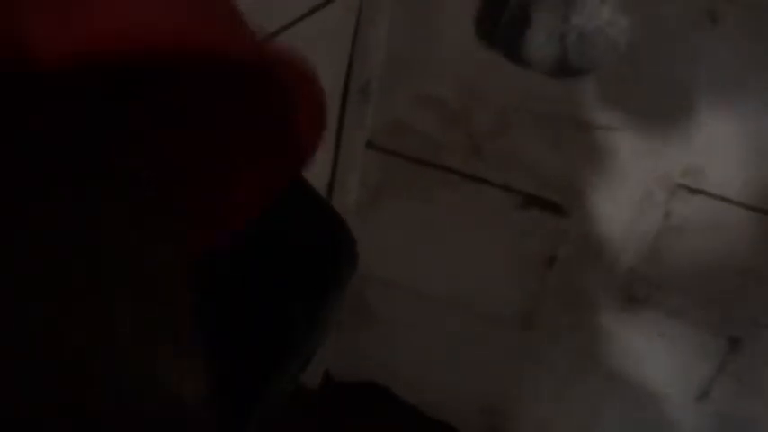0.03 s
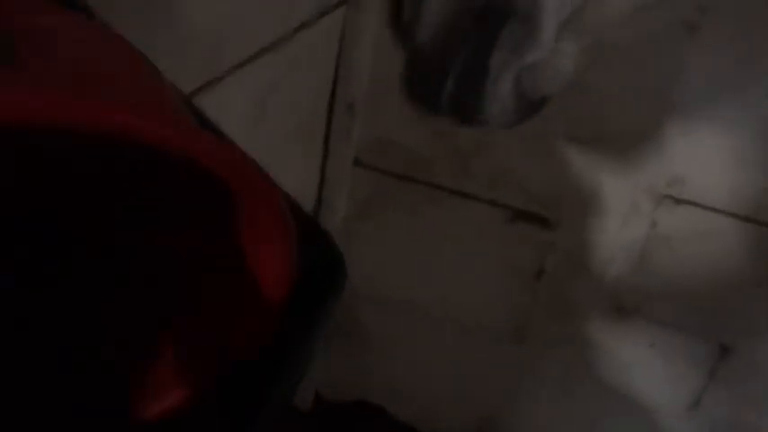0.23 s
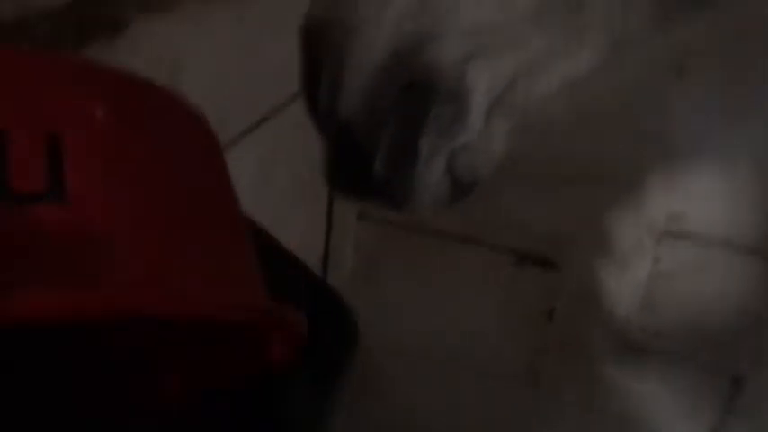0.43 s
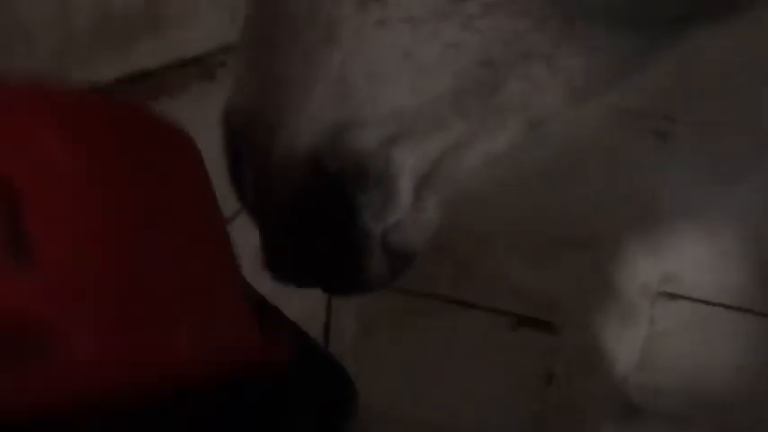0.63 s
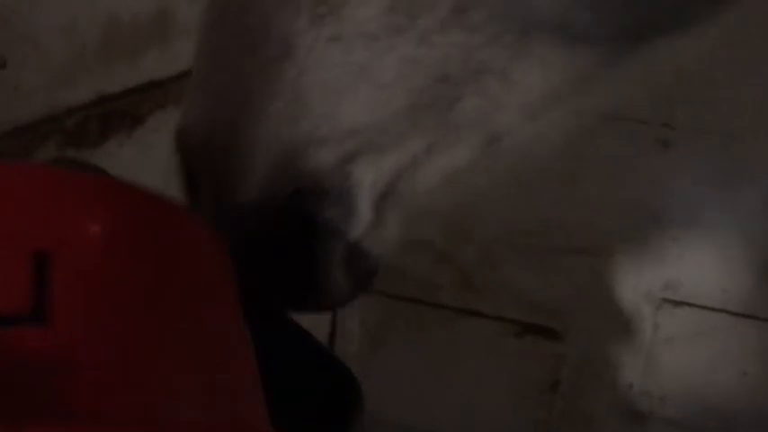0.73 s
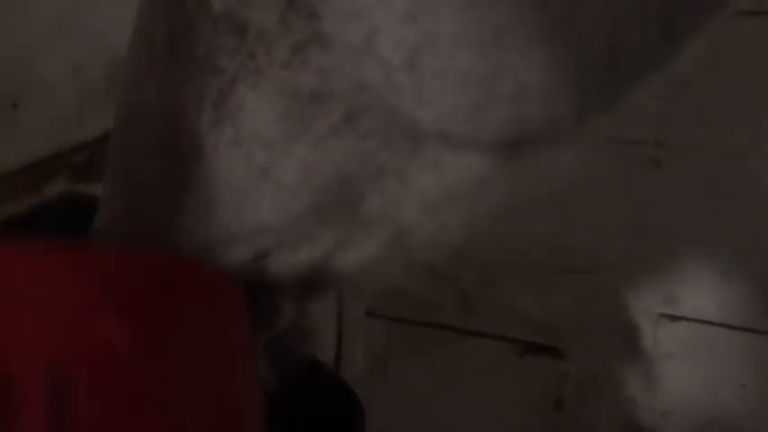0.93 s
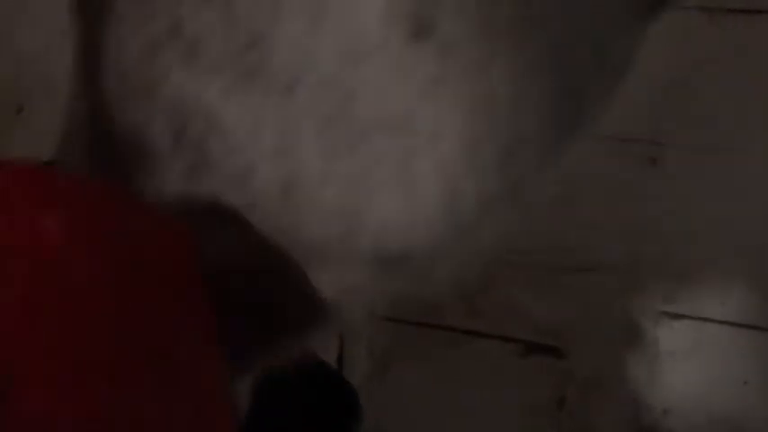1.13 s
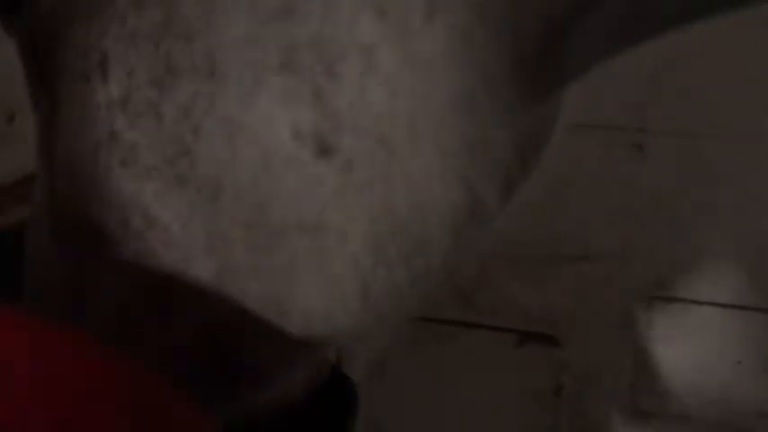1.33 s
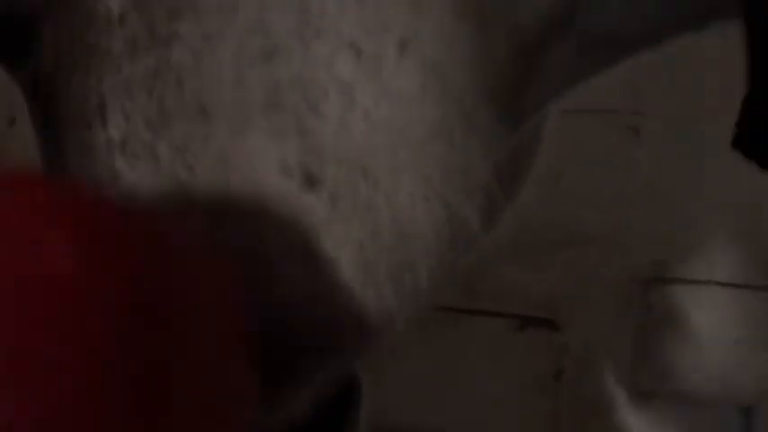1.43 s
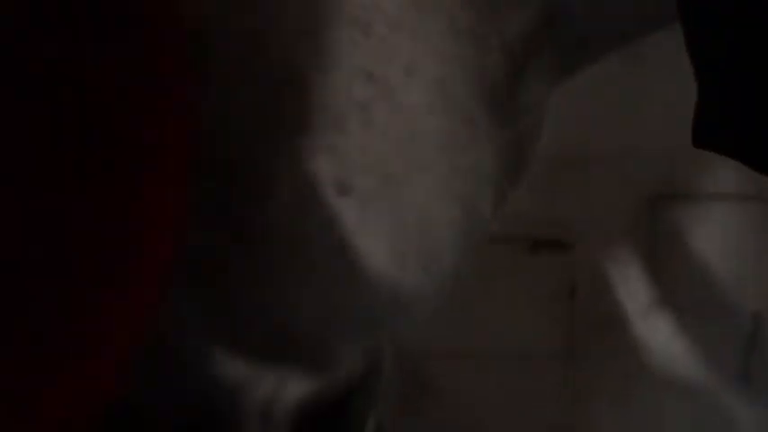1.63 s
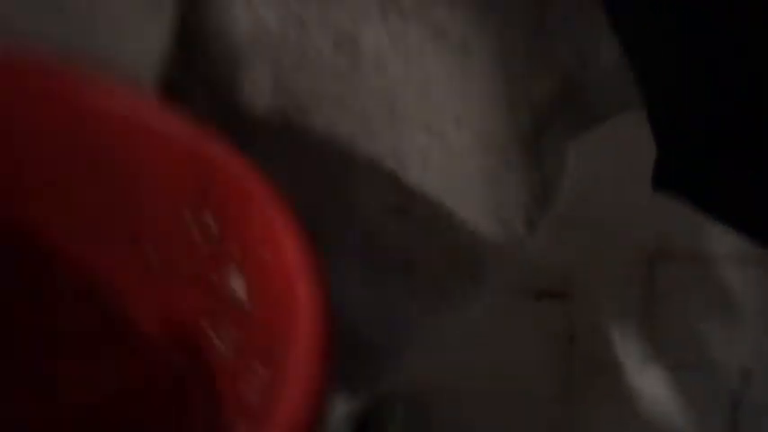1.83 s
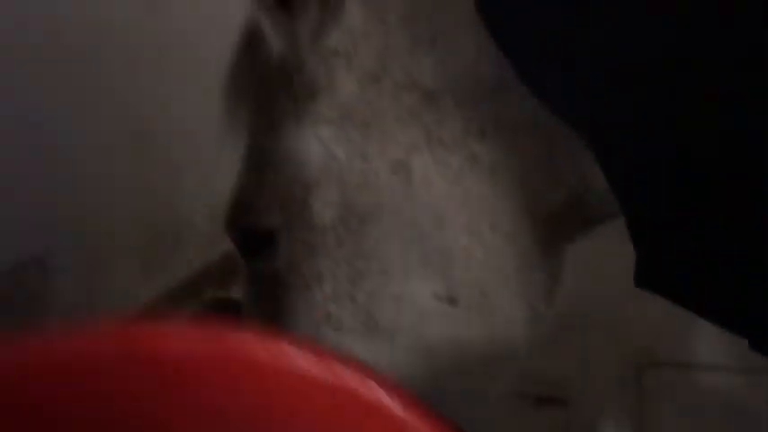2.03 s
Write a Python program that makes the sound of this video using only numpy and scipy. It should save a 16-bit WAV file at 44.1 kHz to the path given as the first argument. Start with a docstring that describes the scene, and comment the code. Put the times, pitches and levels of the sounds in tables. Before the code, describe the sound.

Plastic feed bucket knocks hollowly on a tub as the last pellets hiss out, then scuffs away

```python
"""In a horse stall, the last feed slides hissing out of a plastic bucket into a tub, as dense tiny impacts.
Stray pellets tick during the pour and on among the knocks, each a short noise burst with its own pitch.
The bucket knocks on the tub: its base booms and its wall rings as fading tones, noise cracks, the tub hums on.
Then it scuffs away with hollow rumbles made of quick slips, and a few dull bumps, each one short low tone.
The stable adds a short, dull echo and a low background rumble."""
import sys
import numpy as np
from scipy import signal
from scipy.fft import rfft, irfft, next_fast_len
from scipy.io import wavfile

SR = 44100
rng = np.random.default_rng(int(sys.argv[2]) if len(sys.argv) > 2 else 0)


def generate_wav(signal):
    """Clip the signal to [-1, 1] and save it as 16-bit WAV at the path in sys.argv[1]."""
    frames = np.transpose(np.atleast_2d(signal))
    scaled = np.clip(frames, -1, 1) * 32767
    pcm = np.round(scaled).astype(np.int16)
    wavfile.write(sys.argv[1], SR, pcm)


N = 91595
T = np.arange(N) / SR  # time of every sample [s]


def amp(db):
    """Turn decibels into a gain."""
    return 10 ** (np.asarray(db) / 20)


def unit(x):
    """Scale x to an average (rms) level of 1."""
    return x / np.sqrt(np.mean(x ** 2) + 1e-20)


def along(points, hz):
    """Read a curve of (frequency, value) points, with frequency on a log axis."""
    f, v = np.transpose(points)
    return np.interp(np.log(hz + 1), np.log(f + 1), v)


def filtered(x, response):
    """Multiply the spectrum of x by a response that depends on frequency."""
    m = next_fast_len(len(x) + 8192)  # spare room for what rings past the end
    hz = np.fft.rfftfreq(m, 1 / SR)
    return irfft(rfft(x, m) * response(hz), m)[:len(x)]


def coloured(x, spectrum):
    """Shape x by a spectrum and bring it to rms 1."""
    return unit(filtered(x, lambda hz: amp(along(spectrum, hz))))


def dying(spectrum, t60s):
    """Make a half-second noise burst whose bands die away at their own speeds."""
    noise = coloured(rng.standard_normal(SR // 2), spectrum)
    hz, t, bands = signal.stft(noise, SR, nperseg=128)
    fade = amp(-60 * t / along(t60s, hz)[:, None])
    return signal.istft(bands * fade, SR, nperseg=128)[1][:SR // 2]


def add(out, s, x):
    """Mix x into out from time s [s]."""
    i = max(0, round(s * SR))
    out[i:i + len(x)] += x[:N - i]


def grains(per_s):
    """Mix random tiny impacts of uneven size with an equal share of smooth noise."""
    chance = np.clip(per_s / SR, 1e-4, 1)  # of an impact at each sample
    hits = (rng.random(N) < chance) * rng.standard_normal(N)
    return unit(hits / np.sqrt(chance)) + rng.standard_normal(N)


def ring(modes, rise_s, sag):
    """Ring fading modes (Hz, dB, t60 s) that start sharp by the share sag while the plastic is bent."""
    sag_s, scatter_db = 0.0033, 1  # settling time of the pitch, random spread of the mode levels
    t = T[:SR // 2]
    bent = t + sag * sag_s * (1 - np.exp(-t / sag_s))  # time runs fast at first, so the pitch is high
    tone = np.zeros(len(t))
    for k, (hz, db, t60) in enumerate(modes):
        level = amp(db + scatter_db * rng.standard_normal() - 60 * t / t60)
        tone += (-1) ** k * level * np.sin(2 * np.pi * hz * bent)
    return tone * (1 - np.exp(-(t / rise_s) ** 2))


def knocks():
    """Each knock cracks, rings the wall, sends a falling bending wave round it, swells the base, hums the tub."""
    # bucket knocks: (time [s], boom level [dB], base pitch [Hz], ring length [factor], wall level [dB],
    # wall pitch favoured by the struck spot [Hz], bending wave level [dB], crack level [dB], tub hum level [dB])
    knock_table = [(0.0003, -6, 168, 0.47, -50, 1214, -30.5, -52, -62),
                   (0.113, -18.5, 222, 0.66, -54, 1370, -62, -54, -56.5),
                   (0.3998, 1.5, 227.5, 0.55, -16, 1745, -12, -29, -43.5),
                   (1.0917, -5, 208.8, 0.87, -23.5, 1360, -25, -17.5, -46),
                   (1.1118, 2.5, 219.4, 1.07, -17, 1368, -20, -9, -21.5),
                   (1.3843, -4.5, 214, 1.12, -27.5, 1500, -27.5, -17, -41),
                   (1.821, -34.5, 222, 2.66, -46.5, 2170, -55, -41.5, -67)]
    # modes of the base: (ratio to its pitch, level [dB], 60 dB fade before the length factor [s])
    base_modes = [(0.538, -17.5, 0.3), (0.808, -4.5, 0.12), (1.002, 5.5, 0.065), (1.15, -28.5, 0.12),
                  (1.58, -12, 0.078), (1.949, -13.5, 0.047)]
    # modes of the wall: (pitch [Hz], level before the spot's boost [dB], 60 dB fade [s])
    wall_modes = [(528, -8.5, 0.047), (678, -13, 0.044), (855, -6.5, 0.043), (1148, -2, 0.031),
                  (1419, -6.5, 0.045), (1604, -12.5, .035), (1744, -4, 0.03), (2044, -1, 0.016),
                  (2327, -7, .04), (2695, -9, 0.018), (3365, -11.5, .03)]
    # colour of the crack: (frequency [Hz], level [dB])
    crack_colour = [(200, 6), (500, -4), (1000, -7), (1500, -10.5), (2600, -11.5), (4200, -13.5),
                    (6500, -28.5), (15000, -39)]
    # how fast the crack dies: (frequency [Hz], 60 dB fade [s])
    crack_fade = [(300, 0.027), (1500, 0.073), (4000, 0.038), (12000, 0.062)]
    boom_rise_s, wall_rise_s, wall_sag = 0.0076, 0.0012, 0.092
    spot_db, spot_q = 11, 12  # boost near the struck spot's pitch and its sharpness
    tub_hz, tub_t60_s, tub_rise_s = 48.5, 1.51, 0.0049
    flex_from_hz, flex_to_hz, flex_fall_s, flex_t60_s = 1460, 401, 0.0011, 0.058

    out, t = np.zeros(N), T[:SR // 2]
    onset = 1 - np.exp(-t / wall_rise_s)
    hum = np.sin(2 * np.pi * tub_hz * T) * amp(-60 * T / tub_t60_s) * (1 - np.exp(-T / tub_rise_s))
    flex_hz = flex_to_hz + (flex_from_hz - flex_to_hz) * np.exp(-t / flex_fall_s)
    flex = np.sin(2 * np.pi * np.cumsum(flex_hz) / SR) * amp(-60 * t / flex_t60_s)
    for s, boom_db, base_hz, length, wall_db, spot_hz, flex_db, crack_db, hum_db in knock_table:
        base = [(ratio * base_hz, db, t60 * length) for ratio, db, t60 in base_modes]
        wall = [(hz, db + spot_db / (1 + (spot_q * (hz / spot_hz - 1)) ** 2), t60)
                for hz, db, t60 in wall_modes]
        crack = amp(crack_db) * dying(crack_colour, crack_fade)
        add(out, s, amp(boom_db) * ring(base, boom_rise_s, sag=0))
        add(out, s, amp(wall_db) * ring(wall, wall_rise_s, wall_sag))
        add(out, s, onset * (crack + amp(flex_db) * flex))
        add(out, s, amp(hum_db) * hum)
    return out


def feed():
    """Grains slide over plastic, denser as the treble of the flow grows; the tub drones under them."""
    # sliding feed: (time [s], level of the mids [dB], of the upper mids [dB], of the treble [dB])
    pour = [(0, -34.5, -31, -37), (.1, -39, -40, -41.5), (0.222, -39.5, -39, -35.5),
            (0.286, -45, -35.5, -40), (.345, -39.5, -28, -38.5), (0.391, -44, -37, -38),
            (0.468, -47, -48, -41), (.565, -58, -50.5, -42), (0.641, -51.5, -36.5, -46.5),
            (0.666, -61, -47.5, -43), (0.747, -50, -45.5, -39.5), (0.832, -90, -65, -51.5),
            (.92, -61.5, -53.5, -56), (0.962, -69, -65, -71), (1.032, -56.5, -65, -53.5),
            (1.07, -75, -86, -79), (1.158, -35.5, -62, -55.5), (1.206, -51.5, -33, -35),
            (1.239, -57, -65, -66), (1.282, -63, -75, -58), (1.308, -65, -57.5, -56),
            (1.40, -49.5, -64, -54), (1.65, -92, -85, -67)]
    # colours of the three parts of the hiss: (frequency [Hz], level [dB])
    mids_colour = [(300, -10.5), (680, -14.5), (950, -5.5), (1350, -4), (1900, -11), (3000, -11),
                   (6000, -34)]
    upper_colour = [(700, -62), (1300, 0.5), (1900, 4.5), (2600, 6), (4000, 2.5), (6000, -5), (10000, -10)]
    treble_colour = [(2500, -8.5), (5000, 3), (6500, 4), (7600, -1), (9200, 4.5), (10400, -3), (12000, 4),
                     (15500, -2)]
    # colour of the tub's drone: (frequency [Hz], level [dB])
    drone_colour = [(25, -32), (42, -15), (53, 7.5), (78, -20), (110, -7), (230, -8.5), (330, -23.5),
                    (700, -43)]
    drone_db = -1  # relative to the mids
    grains_per_s, dense_at_db = 5000, -37.5  # impact rate when the treble is at this level

    s, *levels = np.transpose(pour)
    mids, upper, treble = [amp(np.interp(T, s, db)) for db in levels]
    rate = grains_per_s * treble / amp(dense_at_db)
    hiss = mids * coloured(grains(rate), mids_colour)
    hiss += upper * coloured(grains(rate), upper_colour)
    hiss += treble * coloured(grains(rate), treble_colour)
    drone = amp(drone_db) * mids * coloured(rng.standard_normal(N), drone_colour)
    return hiss + drone


def pellets():
    """Stray pellets tick on the plastic, each a fading noise burst with its own pitch."""
    # single pellets: (time [s], level [dB], click pitch [Hz])
    pellet_table = [(0.348, -42, 5020), (.572, -33.5, 3520), (.595, -34.5, 4440), (.616, -26.5, 5800),
                    (0.635, -34, 4000), (.647, -30, 5500), (0.7326, -26, 9400), (.785, -36.5, 11000),
                    (.804, -37, 6040), (0.865, -29, 2650), (0.867, -35.5, 5900), (1.017, -45, 6140),
                    (1.1365, -27.5, 9500), (1.177, -27.5, 12500), (1.1935, -28, 10710), (1.223, -37, 11100),
                    (1.2535, -37, 9000), (1.2708, -31.5, 3080), (1.273, -33, 7900), (1.334, -40, 2410),
                    (1.341, -38.5, 4000), (1.363, -42, 9000), (1.405, -40.5, 9930), (1.511, -38.5, 4900),
                    (1.751, -52.5, 11300), (1.797, -44, 1840)]
    # colour shared by all ticks: (frequency [Hz], level [dB])
    tick_colour = [(400, -31), (1100, 5), (2500, 5), (6000, 5), (15500, 2.5)]
    ring_db, ring_q, t60_s = 9, 4, 0.026  # boost at the pitch, its sharpness, 60 dB fade

    out, t = np.zeros(N), T[:4096]
    for s, db, pitch in pellet_table:
        def response(hz):
            boost_db = ring_db / (1 + (ring_q * (hz / pitch - 1)) ** 2)
            return amp(along(tick_colour, hz) + boost_db)
        tick = unit(filtered(rng.standard_normal(len(t)), response))
        add(out, s, amp(db - 60 * t / t60_s) * tick)
    return out


def scuffs():
    """The bucket drags over the tub's rim: quick slips rasp and shake its hollow body."""
    # scuffs: (time [s], rise [s], hold [s], 60 dB fade [s], thud level [dB], rasp level [dB])
    scuff_table = [(1.407, 0.0043, 0.034, 0.077, -24, -39), (1.442, 0.012, 0.021, 0.24, -17.5, -22.5),
                   (1.532, 0.019, 0.021, 0.18, -22, -25.5), (1.591, 0.0088, 0.037, 0.59, -30.5, -42.5)]
    # colours of the hollow thud and the rasp: (frequency [Hz], level [dB])
    thud_colour = [(25, -23), (50, -8), (88, -3.5), (125, 1.5), (170, -2), (250, -4.5), (400, -22.5),
                   (650, -20.5), (1100, -41.5), (2000, -44), (5000, -67)]
    rasp_colour = [(150, 7.5), (300, 8), (480, -0.5), (850, -3.5), (1400, -10), (2000, -17), (2900, -14.5),
                   (4500, -28.5), (8000, -39.5), (15000, -63)]
    slips_per_s = 600

    out = np.zeros(N)
    for s, rise_s, hold_s, t60, thud_db, rasp_db in scuff_table:
        push = np.minimum(T / rise_s, 1) * amp(-60 * np.maximum(T - rise_s - hold_s, 0) / t60)
        thud = amp(thud_db) * coloured(grains(slips_per_s), thud_colour)
        rasp = amp(rasp_db) * coloured(grains(slips_per_s), rasp_colour)
        add(out, s, push * (thud + rasp))
    return out


def bumps():
    """Soft contacts as the bucket is lifted away each sound one short low tone with a pitch of its own."""
    # dull bumps of the hollow body: (time [s], level [dB], pitch [Hz])
    bump_table = [(1.455, -4.5, 89.2), (1.480, -12.5, 84.9), (1.541, -17, 87.5), (1.575, -20, 93.4),
                  (1.647, -23, 67.4), (1.693, -26, 123), (1.79, -33.5, 106), (2.037, -42.5, 111)]
    rise_s, t60_s = 0.004, 0.17

    out = np.zeros(N)
    swell = amp(-60 * T / t60_s) * (1 - np.exp(-(T / rise_s) ** 2))
    for s, db, hz in bump_table:
        add(out, s, amp(db) * swell * np.sin(2 * np.pi * hz * T))
    return out


def stable(x):
    """A few dull early echoes come off the tub and the stall boards, with the short tail of the stall."""
    # colour of the tail: (frequency [Hz], level [dB])
    tail_colour = [(60, 16.5), (250, 1), (1000, -2), (4000, -2), (15000, 3)]
    # how fast the tail dies: (frequency [Hz], 60 dB fade [s])
    tail_fade = [(60, 0.29), (200, 0.5), (1000, 0.25), (4000, 0.51), (12000, 0.04)]
    # early echoes: (delay [s], level [dB])
    early = [(.0093, -19.5), (0.0255, -17), (0.03, -16), (.052, -20.5)]
    tail_db, tail_delay_s, early_cut_hz = -19, 0.014, 1100

    tail, out = dying(tail_colour, tail_fade), np.zeros(N)
    add(out, tail_delay_s, signal.fftconvolve(x, tail / np.linalg.norm(tail)))

    def echoes(hz):
        delayed = sum(amp(db) * np.exp(-2j * np.pi * hz * s) for s, db in early)
        return delayed / (1 + 1j * hz / early_cut_hz)  # gentle treble cut

    return amp(tail_db) * out + filtered(x, echoes)


def rumble():
    """The stable's steady background is quiet noise, strongest in the bass."""
    # colour of the background: (frequency [Hz], level [dB])
    rumble_colour = [(20, -17), (35, -14), (55, 8), (80, 3.5), (120, -2.5), (250, -8), (500, -17.5),
                     (1000, -18), (2000, -23.5), (5000, -28), (10000, -35), (15500, -35)]
    return amp(-51.5) * coloured(rng.standard_normal(N), rumble_colour)


def scene():
    """Bucket and feed sound close by, with the stable's echo, over its low rumble."""
    near = knocks() + feed() + pellets() + scuffs() + bumps()
    return (near + stable(near) + rumble())[None]


def record(dry):
    """Weaken the deepest rumble, round off the highest peaks, then cut steeply above the band limit."""
    low_cut_hz, full_scale, top_hz = 31, 1.3, 16050
    x = filtered(dry[0], lambda hz: hz ** 3 / np.sqrt(hz ** 6 + low_cut_hz ** 6))
    held = x / (1 + (x / full_scale) ** 8) ** (1 / 8)  # peaks stay below full_scale
    return filtered(held, lambda hz: 1 / np.sqrt(1 + (hz / top_hz) ** 200))[None]


dry = scene()
out = record(dry)
generate_wav(out)
```